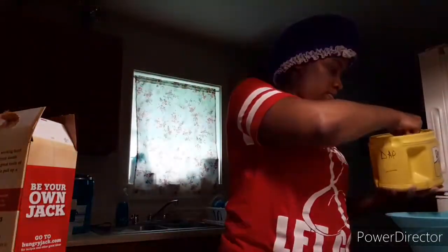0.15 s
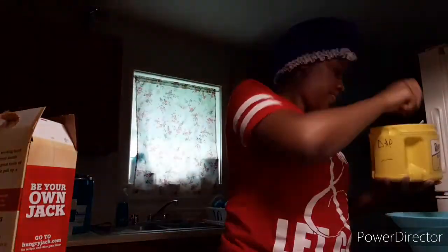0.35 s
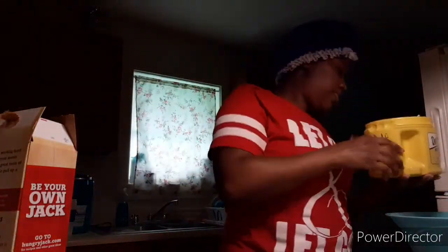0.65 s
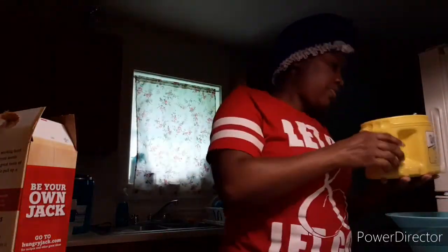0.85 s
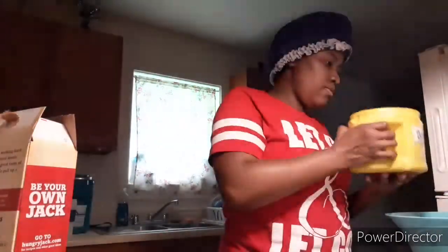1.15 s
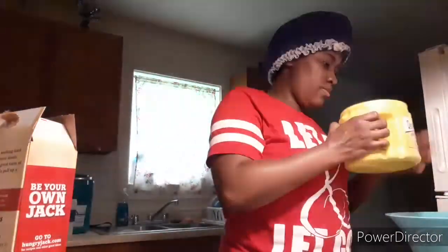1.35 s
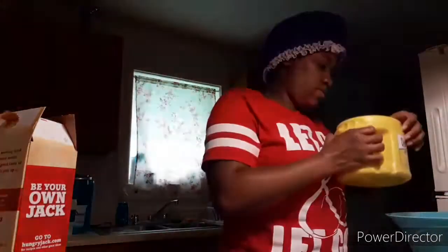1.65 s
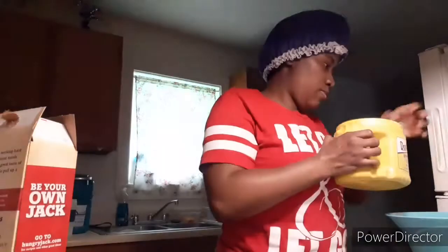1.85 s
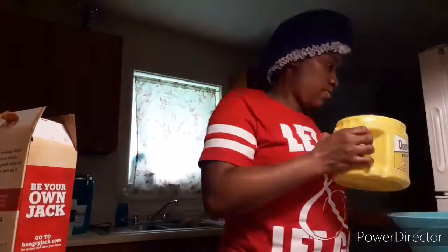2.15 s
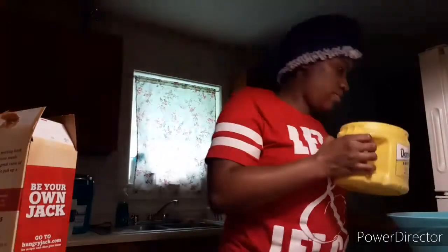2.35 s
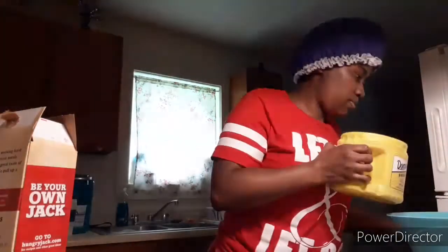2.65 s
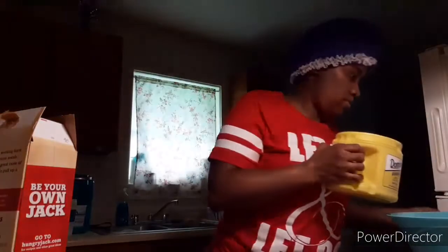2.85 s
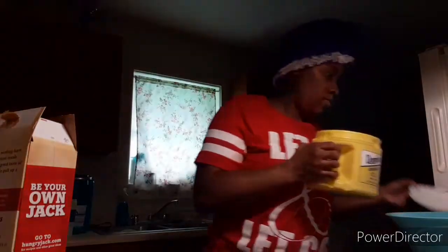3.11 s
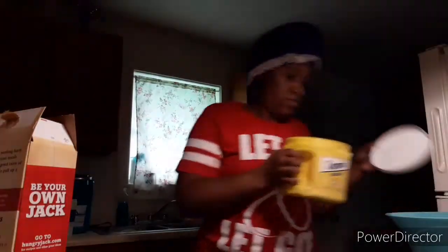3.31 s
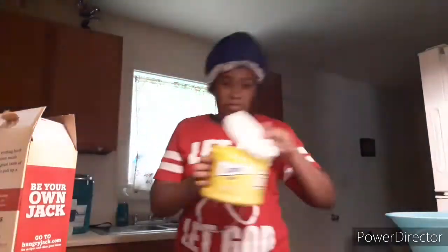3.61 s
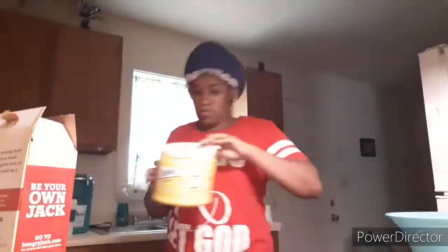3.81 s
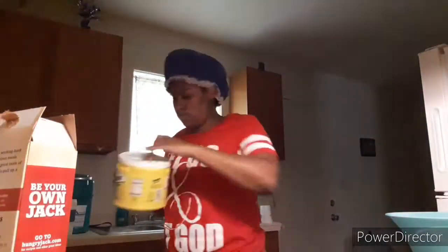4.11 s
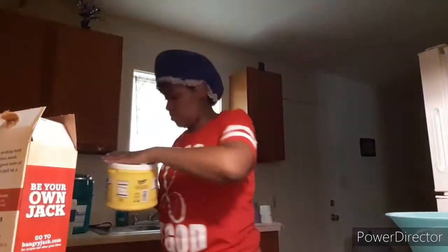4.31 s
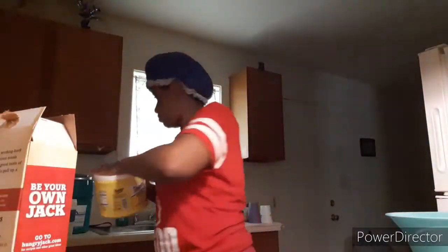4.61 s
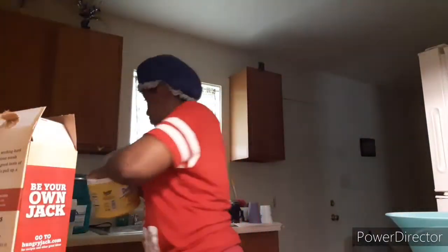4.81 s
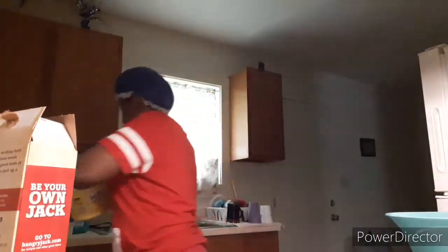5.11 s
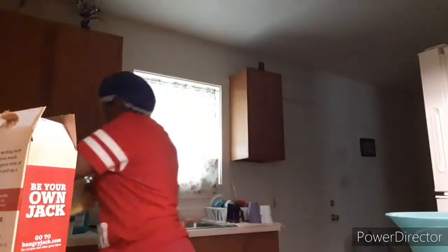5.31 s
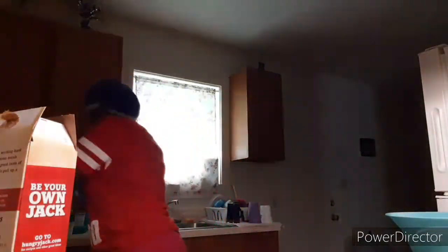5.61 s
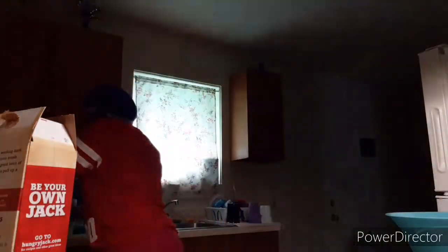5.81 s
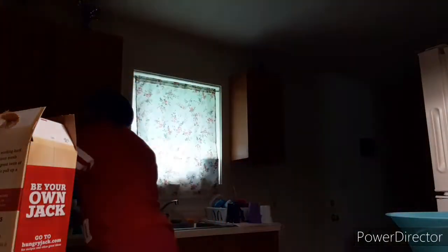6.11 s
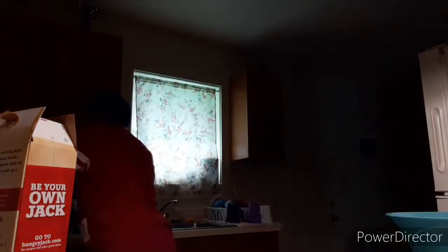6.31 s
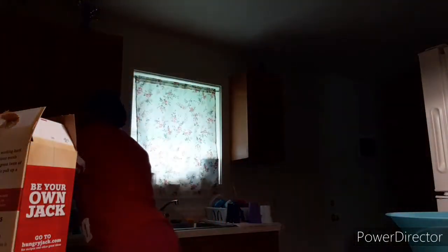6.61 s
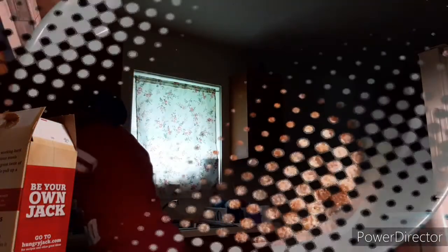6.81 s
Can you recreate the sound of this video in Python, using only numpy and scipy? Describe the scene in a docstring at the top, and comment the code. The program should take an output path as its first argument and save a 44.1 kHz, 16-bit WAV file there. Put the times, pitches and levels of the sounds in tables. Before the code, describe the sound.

Faint refrigerator hum, sparse plastic taps and rim clicks, hollow lid snaps and scrapes, then one loud wooden thud as a tub is set down.

```python
"""Plastic tub in a kitchen

A plastic tub is handled in a small kitchen while a refrigerator hums. Knocks, clicks and lid presses
are sums of decaying modes with bursts of coloured noise; rubbing is noise shaped by uneven slips.
At last the tub comes down on the counter with a heavy thump and a softer second bump, made of a low
thud, ringing wood and clattering plastic. The refrigerator is wavering motor lines over fan noise."""
import sys
import numpy as np
from scipy import signal
from scipy.fft import rfft, irfft, next_fast_len
from scipy.io import wavfile
from scipy.ndimage import uniform_filter1d

SR = 44100
rng = np.random.default_rng(int(sys.argv[2]) if len(sys.argv) > 2 else 0)


def unload_wav(signal):
    """Save mono or channel-first audio to the path in sys.argv[1] as 16-bit WAV at rate SR, clipped to [-1, 1]."""
    wavfile.write(
        sys.argv[1],
        SR,
        np.round(np.clip(np.atleast_2d(signal).T, -1, 1) * 32767).astype(np.int16),
    )


N = 306495
TIME = np.arange(N) / SR
AGE = TIME[:SR * 7 // 10]   # time since the start of a single event [s]

# All table levels are relative: mixing, panning or normalisation follows. # blows on the counter: (time [s],
# thud [dB], thud pitch [Hz], ring of counter and tub [dB], deep shudder [dB], # clatter [dB], crack [dB])
THUMPS = [(6.1444, -12, 223.7, -20, -23, -31, -44.5), (6.152, -30.5, 388, -35.5, -30, -25, -47),
          (6.1621, -17.5, 184, -39, -33, -37.5, -54), (6.4239, -35.5, 228, -43.5, -44, -58, -52),
          (6.434, -38, 154, -52, -30.5, -52, -62)]
# lid pressed home and closed tub bumped: (time [s], level [dB], softness [dB], then above the level:
# wall ring [dB], lid ring [dB], boom [dB]; boom pitch [Hz])
LID_PRESSES = [(3.91, -43, -4, -9, -25, -7, 219), (4.0325, -43, 1, -14, -18, -3, 235),
               (4.0586, -36.5, -3, 2, -13, 0.5, 185), (4.065, -27, 3.5, -5.5, -14.5, -8.5, 245),
               (4.0734, -34, 24, -6, -13, 2, 273), (4.101, -44, 16, -12, -11, 2, 299),
               (4.3903, -39, 17, -7.5, -19, 0, 220), (4.5785, -48.5, 25, -8, -23, 3, 205),
               (4.672, -47.5, 22, -10, -31, -3, 239), (4.8527, -29, 13, -2, -12, -4, 257),
               (4.876, -42.5, -0.5, -5, -4, -7, 260)]
# knocks on the open tub's wall: (time [s], level [dB], softness [dB], dent above the level [dB])
WALL_KNOCKS = [(0.9742, -40, 17, -17.5), (1.0474, -39, -7.5, 7), (1.059, -44, 2, -4), (1.1023, -39, 6, -5),
               (1.1085, -45, 3, -2), (1.1215, -45, 1, 1)]
# clicks of the rim and of the lid's edge catching on it: (time [s], level [dB], sharpness [dB],
# rim pitch [Hz], tick above the level [dB])
RIM_CLICKS = [(0.7733, -54.5, -6, 2640, -9.5), (1.6118, -40, -4.5, 2940, -16.5),
              (1.7117, -40.5, -17, 3450, -14), (1.7152, -50, -11, 4400, -6), (2.4168, -51, 4, 2860, -13),
              (2.5501, -45.5, 6.5, 1830, -23), (2.5617, -56, 18, 3960, -10), (2.6295, -31, -17, 1430, -22),
              (2.634, -34.5, -9, 1920, -18), (3.6146, -55, -6, 2500, -18), (3.6374, -35.5, -1, 2700, -28),
              (3.804, -49.5, -11, 3630, -21.5), (3.834, -49, 2.5, 2280, -18),
              (3.9065, -43.5, 11.5, 3960, 1.5), (3.9902, -65.5, -2, 2820, 6), (4.287, -50, 4, 4200, -14),
              (4.342, -47, -6, 3670, -15), (4.613, -46.5, 1, 2200, -27), (4.642, -66, -3, 3400, -13),
              (5.245, -49, -12, 1270, -26), (5.314, -48.5, -14, 3630, -31)]
# hands shifting on the wall: (peak time [s], length [s], level [dB], rasp above it [dB], rasp pitch [Hz])
HAND_SHIFTS = [(1.033, 0.081, -46, -8.5, 2200), (1.085, 0.063, -43, -18, 2700),
               (1.118, 0.038, -47, -3.5, 2700), (2.465, 0.15, -52.5, -7, 2400),
               (2.58, 0.15, -52, -1.5, 2840), (5.14, 0.25, -62, -2.5, 2400), (5.275, 0.1, -68, 6, 2230)]
# strokes along the rim: (peak time [s], length [s], level [dB], rasp above it [dB], rasp pitch [Hz])
RIM_STROKES = [(3.652, 0.058, -49, 7, 2560), (3.833, 0.13, -61, 5, 3600), (4.059, 0.015, -40.5, 2, 3580),
               (4.17, 0.084, -58, 8, 3800), (4.232, 0.072, -47, -2, 5230), (4.262, .06, -47.5, -6.5, 4640),
               (4.325, 0.077, -46.5, 4.5, 4130), (4.357, 0.018, -53, 8, 5000),
               (4.38, 0.046, -54, 7.5, 3560), (4.548, 0.088, -55, 2, 4300), (4.605, 0.04, -55, 1, 2400),
               (4.645, 0.065, -51.5, -9, 3400), (4.724, 0.053, -53, 8.5, 3870),
               (4.76, 0.04, -53.5, 7.5, 3600), (5.338, 0.063, -53, 4, 3380), (5.42, 0.34, -66, 0.5, 3600)]

# modes rung by a thump, the counter top's low ones and the tub's plastic at the top: (frequency [Hz], level
# [dB], t60 [s])
COUNTER = [(140, -1.5, 0.3), (194.8, -2.5, 0.44), (247, -10, 0.18), (291.4, -6, 0.19), (378.6, -6.5, 0.14),
           (465.2, -6, 0.22), (617, -9, 0.083), (990, -1, 0.056), (1270, -9, 0.058)]
# modes of the cabinet below: (frequency [Hz], level [dB], t60 [s])
CABINET = [(52.9, 1, 0.71), (65.4, 16, 0.23), (86.5, 17, 0.1), (107, 5, 0.08)]
# modes of the tub's air and floor, transposed to each boom: (frequency [Hz], level [dB], t60 [s])
HOLLOW = [(175.6, -12.5, 0.076), (254, 4, 0.036), (319, -10.5, 0.048)]
# modes of the tub's walls, transposed and tilted by each touch: (frequency [Hz], level [dB], t60 [s])
WALLS = [(473, -3.5, 0.1), (569, 6, 0.055), (702, -5.5, 0.046), (807, 5, 0.082), (956, 5, 0.07),
         (1244, -13, 0.057)]
# modes of the thin wall as it dents and pops back: (frequency [Hz], level [dB], t60 [s])
DENT = [(503, 0, 0.042), (571, 0.5, 0.041), (1020, 3.5, 0.017), (1840, -1.5, 0.014), (2660, -13.5, 0.024),
        (2980, -20, 0.023)]
# modes of the lid stretched over the tub: (frequency [Hz], level [dB], t60 [s])
LID = [(563, 0, 0.06), (679, -2.5, 0.04), (774, 0, 0.044), (897, -5, 0.066), (1038, -0.5, 0.068),
       (1108, -11, 0.05), (1277, -6, 0.064)]
# modes of the stiff rim: (frequency [Hz], level [dB], t60 [s])
RIM = [(2015, -7, 0.066), (3160, -7.5, 0.08), (3580, 2, 0.031), (4070, -5, 0.03), (5220, 7.5, 0.03),
       (6250, 5, 0.039)]

# colour of the wall's crowded low modes: (frequency [Hz], density [dB per Hz])
RUMBLE = [(250, -41), (500, -1), (1000, -14), (1400, -12.5), (2200, -49)]
# colour of plastic clacking: (frequency [Hz], density [dB per Hz])
CLACK = [(500, 2.5), (1300, 5.5), (2100, 5), (3200, 2), (5500, -4), (7500, -41), (11000, -24)]
# colour of plastic snapping: (frequency [Hz], density [dB per Hz])
SNAP = [(2000, -16.5), (3500, 2.5), (7200, -4), (8600, 0), (10500, 1.5), (12500, -0.5), (15500, -13.5)]
# colour of the clatter in a thump: (frequency [Hz], density [dB per Hz])
CLATTER = [(200, 2), (450, 2), (720, -2), (980, -2), (1400, -10), (2200, -12), (3500, -23.5), (7000, -39)]
# colour of the crack in a thump: (frequency [Hz], density [dB per Hz])
CRACK = [(1200, 8), (2600, 11.5), (5500, 11), (7300, 4.5), (10000, 7), (12500, 5.5), (15500, -22)]
# colour of plastic gripping as it slides: (frequency [Hz], density [dB per Hz])
RASP = [(800, 1.5), (1500, -1), (2300, 3.5), (3700, 0), (5500, -0.5), (7500, -12), (11000, -31)]
# refrigerator motor lines: (frequency [Hz], amplitude before the waver [dB])
HUM = [(119.2, -56.5), (165.8, -50.5), (478, -64.5), (563, -66)]
# refrigerator fan noise: (frequency [Hz], density [dB per Hz])
FAN = [(25, -8), (45, -13), (66, -4), (95, -8.5), (160, 0.5), (245, 0.5), (315, -14), (400, -11),
       (520, -4.5), (660, -14.5), (830, -13.5), (1200, -20), (1700, -33), (3000, -47.5)]
# faint steady hiss: (frequency [Hz], density [dB per Hz])
HISS = [(1060, -33), (1800, -3), (2800, 2), (3510, -7), (4510, -4), (6410, -1), (7610, -6.5), (8320, 1),
        (9280, 1), (11100, 0), (14600, -12.5), (15500, -32)]
# likeness of the two channels of noise: (frequency [Hz], correlation [-1 to 1])
CORRELATION = [(100, 1), (250, 1), (500, 0.17), (1000, 0.2), (2500, 0.0014), (10000, 0.029)]

MODE_VARY_DB = 1.5   # chance spread of each mode from blow to blow
THUD_T60_S, THUD_RISE_S = 0.034, 0.0091
PRESS_CLACK_DB, PRESS_SNAP_DB, PRESS_TICK_DB = -1.5, -10.5, -2.5
PRESS_WALL_HZ, PRESS_RIM_HZ = 585, 2460
SOFT_CLACK_SHARE = 0.16   # a soft press loses all its softness in the snap, this share in the clack
KNOCK_CLACK_DB, KNOCK_SNAP_DB, KNOCK_TICK_DB = -3, -24.5, -20
KNOCK_WALL_HZ, KNOCK_RIM_HZ = 573, 1940
KNOCK_TILT_DB = 8   # slope of the wall's modes at zero softness [dB per octave]
SOFT_TILT_PER_OCTAVE = 1   # share of a knock's softness that the wall's modes lose with each octave
SOFT_RUMBLE_SHARE = 0.49   # share of a knock's softness that the wall's rumble loses
POP_ROOM_SHARE = 0.3   # share of a dent's pop, with its tick, that spreads into the room
CLICK_SNAP_DB, CLICK_WALL_DB, CLICK_WALL_HZ = -14.5, -18, 604
RIM_RING_DB = -18
RIM_FOCUS_DB_PER_OCTAVE = 15   # loss of a rim mode with its distance from the pitch of the touch
SHIFT_HISS_DB, STROKE_RUMBLE_DB = -14, -25   # the broad wall hardly hisses, the narrow rim rumbles less
SWELL_SHARE = 0.5   # of a stroke's length; the rest is its fade
SLIPS_PER_S, SLIP_SPREAD_DB = 900, 2.5   # mean rate of the catches and spread of their sizes
SLIP_SHARE = 0.3   # share of a stroke's power carried by the slips
JUDDER_DB, JUDDERS_PER_S = 2, 70
HUM_WAVER, HUM_WAVERS_PER_S = 0.45, 16
HISS_DB = -68.5
KITCHEN_T60_S = 0.4
CUTOFF_HZ = 15700


def thumps():
    """Impact on a coupled structure: the tub lands edge first, then flat, exciting wood and plastic."""
    wood, plastic = np.zeros((2, 2, N))
    for s, thud_db, thud_hz, ring_db, shudder_db, clatter_db, crack_db in THUMPS:
        tone = np.sin(2 * np.pi * thud_hz * AGE)
        thud = blow_one(tone * dying(THUD_T60_S) * swelling(THUD_RISE_S))
        counter = ring(COUNTER, rise_s=0.008, vary_db=MODE_VARY_DB)
        cabinet = ring(CABINET, rise_s=0.005, vary_db=MODE_VARY_DB)
        add(wood, s, from_db(thud_db) * thud + from_db(ring_db) * counter + from_db(shudder_db) * cabinet)

        # each plastic sound has a direct burst and a long wash round the room
        clatter = burst(CLATTER, t60=0.058, rise_s=0.0036, peak_hz=980, peak_db=3)
        clatter_wash = from_db(-6.5) * burst(CLATTER, t60=0.43, rise_s=0.0091, size=len(AGE))
        crack = burst(CRACK, t60=0.12, rise_s=0.00054)
        crack_wash = from_db(-4.5) * burst(CRACK, t60=0.48, rise_s=0.0094, size=len(AGE))
        add(plastic, s, from_db(clatter_db) * (clatter + clatter_wash))
        add(plastic, s, from_db(crack_db) * (crack + crack_wash))
    wood = wood + from_db(-13.0) * kitchen(wood, gap_s=0.0236)
    return placed(wood, pan_db=2.0) + placed(plastic, pan_db=2.5)


def lid_presses():
    """Cavity resonance: enclosed air booms at a pitch set by where the hand presses; the lid drums."""
    shell, air = np.zeros((2, 2, N))
    for s, db, soft_db, wall_db, lid_db, boom_db, boom_hz in LID_PRESSES:
        clack_db = db + PRESS_CLACK_DB - SOFT_CLACK_SHARE * soft_db
        snap_db = db + PRESS_SNAP_DB - soft_db
        add(shell, s, plastic_blow(clack_db, snap_db, db + wall_db, PRESS_WALL_HZ, PRESS_RIM_HZ,
                                   tilt_db=-5.0, rumble_db=4.0, rumble_t60=0.17))
        lid = ring(LID, rise_s=0.0023, vary_db=MODE_VARY_DB)
        add(shell, s, from_db(db + lid_db) * lid + from_db(snap_db + PRESS_TICK_DB) * tick())

        transpose = boom_hz / HOLLOW[1][0]
        modes = [(hz * transpose, mode_db, t60) for hz, mode_db, t60 in HOLLOW]
        add(air, s, from_db(db + boom_db) * ring(modes, rise_s=0.0049, vary_db=MODE_VARY_DB))
    shell = shell + from_db(-4.0) * kitchen(shell, gap_s=0.0011)
    air = air + from_db(-4.5) * kitchen(air, gap_s=0.0153)
    return placed(shell, pan_db=2.0) + placed(air, pan_db=2.5)


def wall_knocks():
    """Contact stiffness: the open wall dents with a pop and rings, duller the softer the touch."""
    shell, pops = np.zeros((2, 2, N))
    for s, db, soft_db, dent_db in WALL_KNOCKS:
        edge_db = db - soft_db
        tilt_db = KNOCK_TILT_DB - SOFT_TILT_PER_OCTAVE * soft_db
        rumble_db = 5.0 - SOFT_RUMBLE_SHARE * soft_db
        add(shell, s, plastic_blow(edge_db + KNOCK_CLACK_DB, edge_db + KNOCK_SNAP_DB, db, KNOCK_WALL_HZ,
                                   KNOCK_RIM_HZ, tilt_db, rumble_db, rumble_t60=0.18))
        dent = ring(DENT, rise_s=0.00049, vary_db=MODE_VARY_DB)
        add(pops, s, from_db(db + dent_db) * dent + from_db(edge_db + KNOCK_TICK_DB) * tick())
    direct = placed(shell + pops, pan_db=5.0, lag_s=0.00036)
    room = kitchen(shell + POP_ROOM_SHARE * pops, gap_s=0.0059)
    return direct + placed(from_db(-4.5) * room, pan_db=1.0)


def rim_clicks():
    """Local excitation: the stiff rim rings near the pitch of the touch and barely stirs the wall."""
    out = np.zeros((2, N))
    for s, db, sharp_db, rim_hz, tick_db in RIM_CLICKS:
        snap_db = db + CLICK_SNAP_DB + sharp_db
        add(out, s, plastic_blow(db, snap_db, db + CLICK_WALL_DB, CLICK_WALL_HZ, rim_hz,
                                 tilt_db=3.5, rumble_db=9.0, rumble_t60=0.13))
        modes = []
        for hz, mode_db, t60 in RIM:
            octaves_away = abs(np.log2(hz / rim_hz))
            modes.append((hz, mode_db - RIM_FOCUS_DB_PER_OCTAVE * octaves_away, t60))
        # ring() normalises, so the strongest mode sets how loudly the rim responds
        ring_db = db + RIM_RING_DB + max(mode[1] for mode in modes)
        rim = ring(modes, rise_s=0.00026, vary_db=MODE_VARY_DB)
        add(out, s, from_db(db + tick_db) * tick() + from_db(ring_db) * rim)
    return placed(out + from_db(-3.5) * kitchen(out, gap_s=0.0028), pan_db=2.0)


def plastic_blow(clack_db, snap_db, wall_db, wall_hz, rim_hz, tilt_db, rumble_db, rumble_t60):
    """Modal excitation of a thin shell: it snaps and clacks, and its walls ring and rumble."""
    clack = burst(CLACK, t60=0.16, rise_s=0.000056, peak_hz=rim_hz, peak_db=8.5)
    snap = burst(SNAP, t60=0.11, rise_s=0.0022)
    # a stiffer spot of the wall rings higher, a harder touch favours the upper modes
    main_hz = WALLS[1][0]
    modes = [(hz * wall_hz / main_hz, db + tilt_db * np.log2(hz / main_hz), t60) for hz, db, t60 in WALLS]
    rumble = burst(RUMBLE, t60=rumble_t60, rise_s=0.00066)
    walls = ring(modes, rise_s=0.0048, vary_db=3) + from_db(rumble_db) * rumble
    return from_db(clack_db - 12.0) * clack + from_db(snap_db) * snap + from_db(wall_db - 11.0) * walls


def tick():
    """Short contact, wide spectrum: a hard touch gives a few milliseconds of treble."""
    return burst(SNAP, t60=0.018, rise_s=0.00026)


def rubs():
    """Stick-slip friction: skin and lid slide unevenly; the wall rumbles, the rim hisses, both rasp."""
    out = np.zeros((2, N))
    for strokes, rumble_db, hiss_db in ((HAND_SHIFTS, 0, SHIFT_HISS_DB), (RIM_STROKES, STROKE_RUMBLE_DB, 0)):
        for s, length_s, db, rasp_db, rasp_hz in strokes:
            rumble = from_db(rumble_db) * noise(RUMBLE, len(AGE))
            hiss = from_db(hiss_db) * noise(SNAP, len(AGE))
            rasp = from_db(rasp_db) * noise(RASP, len(AGE), peak_hz=rasp_hz, peak_db=5)
            # the stroke peaks midway through its span
            add(out, s - AGE.mean(), from_db(db) * stroke(length_s) * (rumble + hiss + rasp))
    sliding = placed(from_db(-7.0) * out, pan_db=3.0)
    return sliding + from_db(-1.5) * kitchen(sliding, gap_s=0.0037)


def stroke(length_s):
    """Amplitude modulation by friction: the force swells and fades with judder, catches and slips."""
    t = AGE - AGE.mean()
    width_s = length_s * np.where(t < 0, SWELL_SHARE, 1 - SWELL_SHARE)
    force = np.exp(-np.minimum((t / width_s) ** 2, 50))
    sizes_db = SLIP_SPREAD_DB * np.minimum(rng.exponential(1, len(AGE)), 4)
    catches = (rng.random(len(AGE)) < SLIPS_PER_S / SR) * from_db(sizes_db)
    slips = rms_one(signal.fftconvolve(catches, dying(0.0037))[:len(AGE)])
    judder = from_db(JUDDER_DB * drift(JUDDERS_PER_S)[:len(AGE)])
    return force * judder * np.sqrt(1 - SLIP_SHARE + SLIP_SHARE * slips ** 2)


def refrigerator():
    """Tonal and broadband machine noise: wavering motor lines over fan rush, left side first, and hiss."""
    hum = 0
    for hz, db in HUM:
        # a complex waver moves both the strength and the phase of the line
        waver = 1 + HUM_WAVER * (drift(HUM_WAVERS_PER_S) + 1j * drift(HUM_WAVERS_PER_S))
        hum = hum + from_db(db) * np.real(waver * np.exp(2j * np.pi * hz * TIME))
    machine = hum + from_db(-51.5) * noise(FAN, N)
    hiss = from_db(HISS_DB) * noise(HISS, N)
    return placed(machine, pan_db=1.5, lag_s=0.00027) + placed(hiss, pan_db=3.0)


def kitchen(x, gap_s):
    """Diffuse reverberation: convolution with noise evened in frequency and time, dying as a smooth wash."""
    tail = noise([(100, 0), (10000, 0)], len(AGE))
    envelope = dying(KITCHEN_T60_S) * swelling(gap_s)
    for _ in range(4):
        # flatten the spectrum, then the short-time power
        even = irfft(np.exp(1j * np.angle(rfft(tail * envelope))), len(AGE))
        tail = even / np.sqrt(np.abs(uniform_filter1d(even ** 2, size=128)) + 1e-18)
    response = rms_one(tail * envelope) / np.sqrt(len(AGE))
    return signal.fftconvolve(x, response, axes=1)[:, :N]


def placed(x, pan_db, lag_s=0):
    """Interaural level and time difference: louder at the left, and later at the right."""
    later = np.interp(TIME - lag_s, TIME, x[1])
    return np.array([x[0], later]) * from_db(np.array([[pan_db], [-pan_db]]) / 2)


def ring(modes, rise_s, vary_db):
    """Modal superposition: decaying sines, excited by each blow in its own proportions."""
    tones = 0
    for hz, db, t60 in modes:
        gain = from_db(db + vary_db * rng.normal())
        tones = tones + gain * dying(t60) * np.sin(2 * np.pi * hz * AGE)
    return blow_one(tones * swelling(rise_s))


def burst(spectrum, t60, rise_s, size=len(AGE) // 3, **resonance):
    """High modal density: modes too crowded to tell apart, heard as noise dying together."""
    crowd = np.pad(noise(spectrum, size, **resonance), ((0, 0), (0, len(AGE) - size)))
    return blow_one(crowd * dying(t60) * swelling(rise_s))


def noise(spectrum, size, peak_hz=1000, peak_db=0):
    """Spectral shaping: stereo noise alike in bass and unrelated in treble, with an optional resonance."""
    n = next_fast_len(size)
    hz = np.fft.rfftfreq(n, 1 / SR)
    alike = np.clip(at_hz(CORRELATION, hz), -1, 1)
    mid, side = rfft(rng.standard_normal((2, n)))
    both = np.sqrt(1 + alike) * mid + np.sqrt(1 - alike) * np.array([side, -side])
    resonance_db = peak_db / (1 + ((hz / peak_hz - 1) / 0.18) ** 2)
    colour_db = at_hz(spectrum, hz) + resonance_db
    return rms_one(irfft(both * from_db(colour_db), n)[:, :size])


def dying(t60):
    """Exponential decay: a fall of 60 dB in t60 seconds."""
    return np.exp(-np.log(1000) * AGE / t60)


def swelling(rise_s):
    """Contact compliance: a soft contact builds up its force over this time."""
    return 1 - np.exp(-(AGE / rise_s) ** 2)


def drift(rate):
    """Band-limited chance: a smooth random curve of unit rms with about this many turns a second."""
    slow = signal.resample_poly(rng.standard_normal(int(rate * N / SR) + 8), 8, 1)
    return rms_one(np.interp(TIME * rate * 8, np.arange(len(slow)), slow))


def from_db(db):
    """Logarithmic level: decibels to amplitude gain."""
    return 10 ** (np.asarray(db) / 20)


def rms_one(x):
    """Power normalisation: scale to unit mean square."""
    return x / np.sqrt(np.mean(x ** 2) + 1e-20)


def blow_one(x):
    """Onset normalisation: scale a blow to unit power over its first 25 ms."""
    return x / np.sqrt(np.mean(x[..., :SR // 40] ** 2))


def at_hz(points, hz):
    """Logarithmic pitch scale: interpolate a table along log frequency."""
    f, value = np.transpose(points)
    return np.interp(np.log(hz + 1e-9), np.log(f), value)


def add(out, s, sound):
    """Linear superposition: mix a sound in at time s."""
    i = int(s * SR)
    out[:, i:i + sound.shape[-1]] += sound[..., :N - i]


def scene():
    """Superposition of sources: the tub's sounds over the refrigerator."""
    tub = thumps() + lid_presses() + wall_knocks() + rim_clicks() + rubs()
    return tub + refrigerator()


def record(dry):
    """Transducer response: a brighter right microphone, rounded peaks, deepest bass and top cut."""
    port = signal.lfilter(*signal.iirpeak(8800, 2, fs=SR), dry[1])
    heard = np.tanh(np.array([dry[0], dry[1] + from_db(-2.0) * port]))
    thin = signal.sosfilt(signal.butter(4, 42, "high", fs=SR, output="sos"), heard)
    return signal.sosfilt(signal.ellip(10, 0.1, 80, CUTOFF_HZ, fs=SR, output="sos"), thin)


dry = scene()
out = record(dry)
unload_wav(out)
```